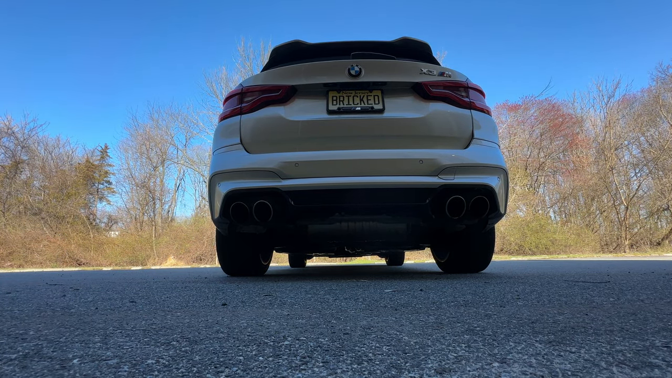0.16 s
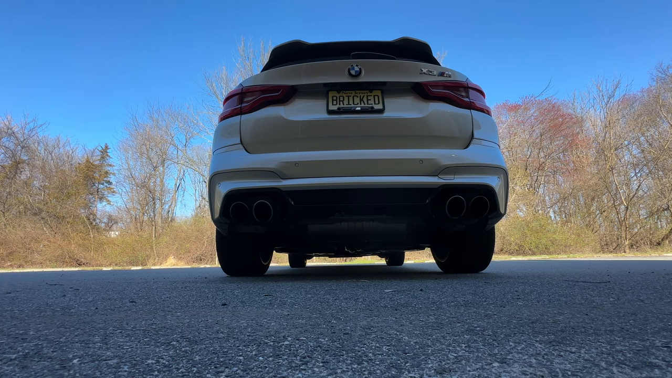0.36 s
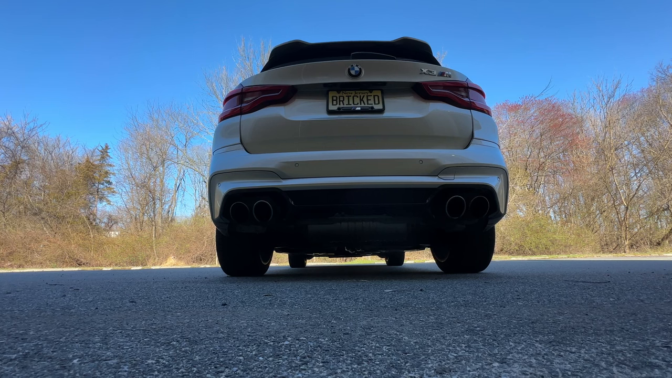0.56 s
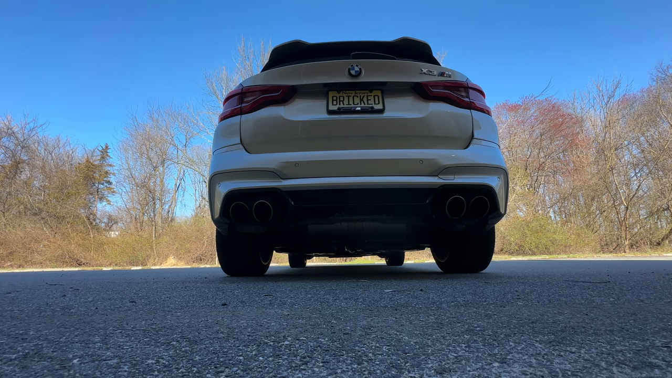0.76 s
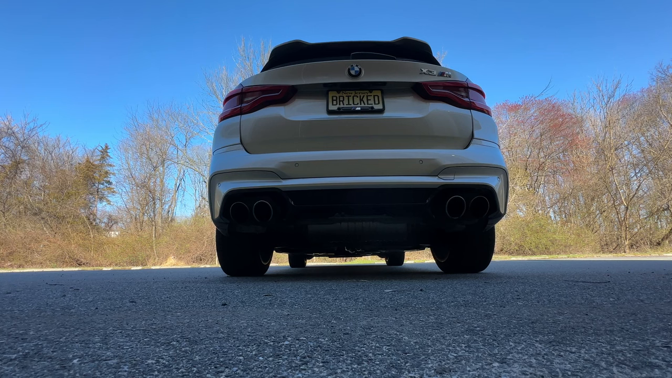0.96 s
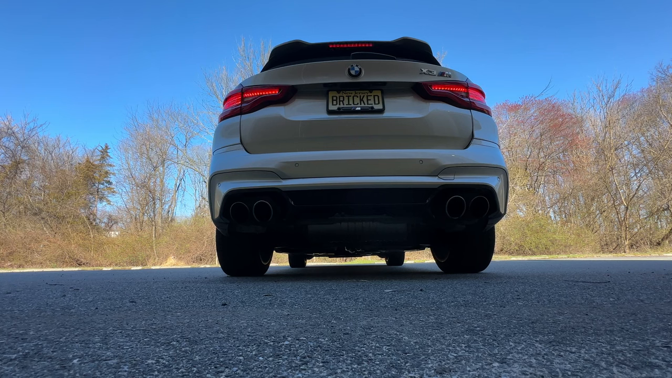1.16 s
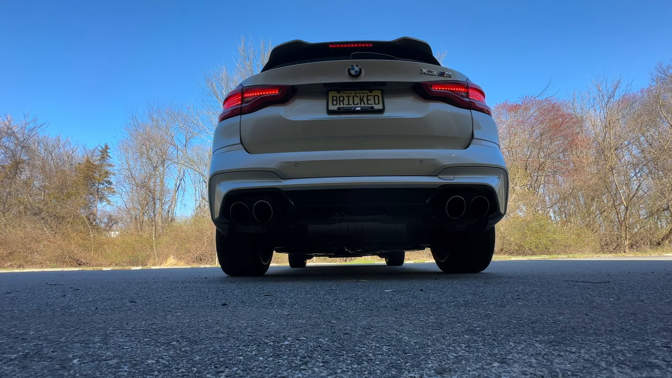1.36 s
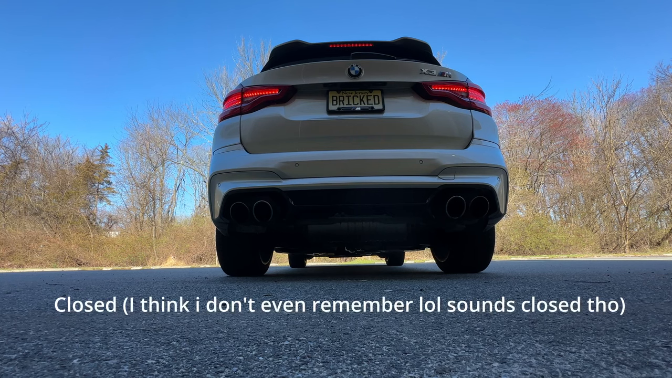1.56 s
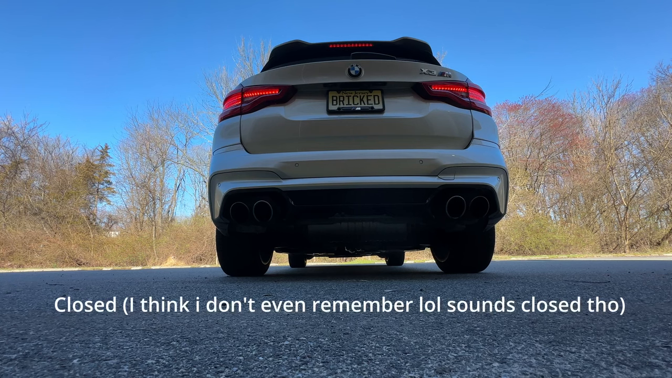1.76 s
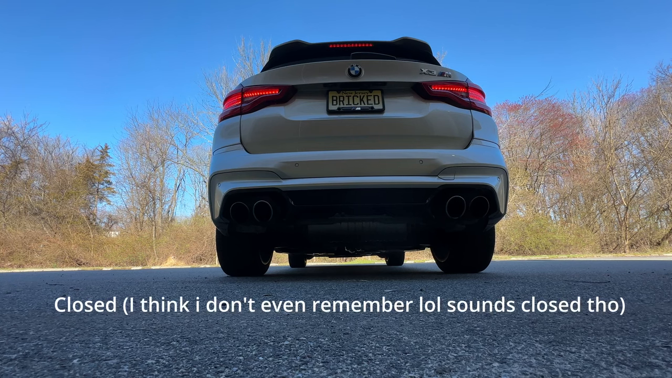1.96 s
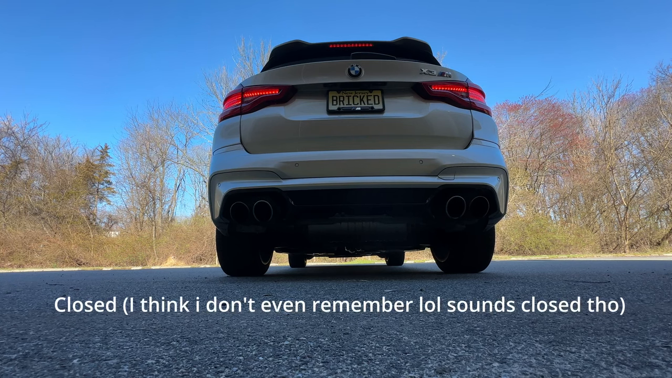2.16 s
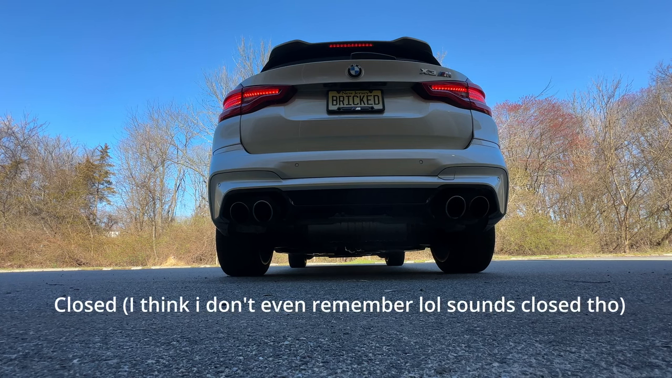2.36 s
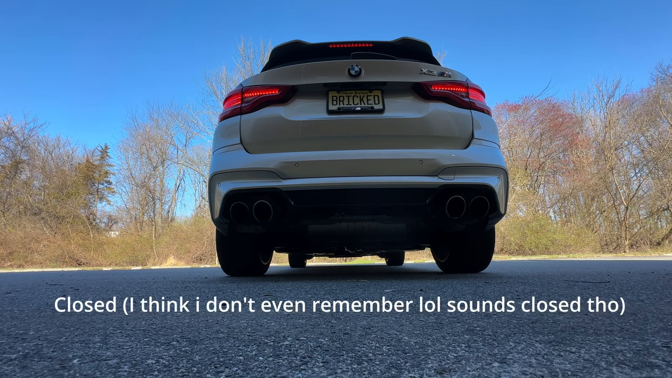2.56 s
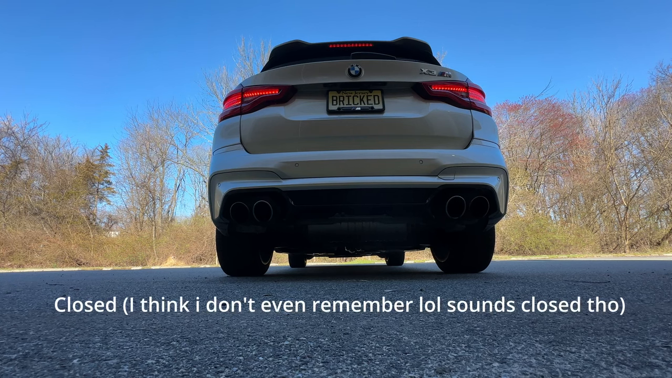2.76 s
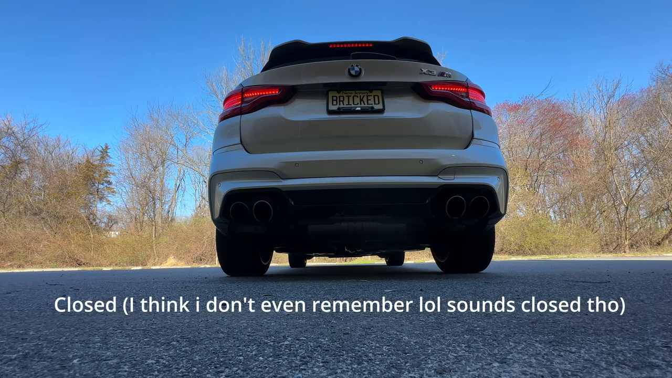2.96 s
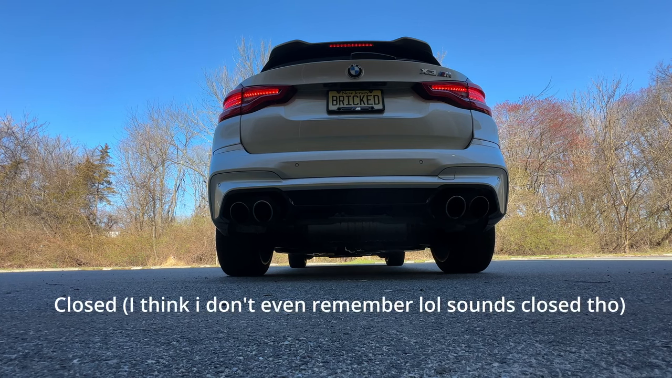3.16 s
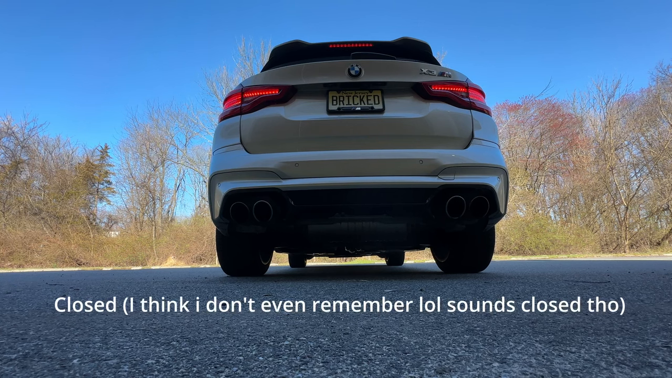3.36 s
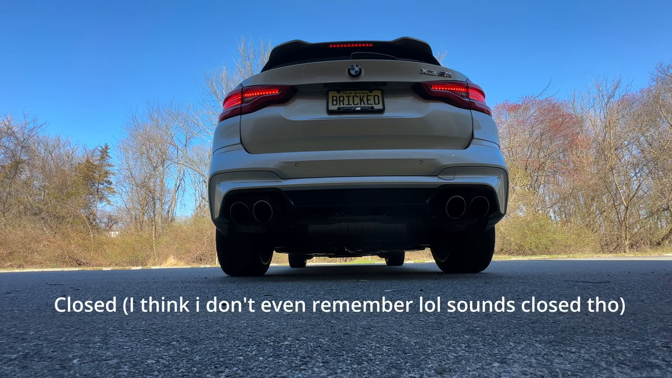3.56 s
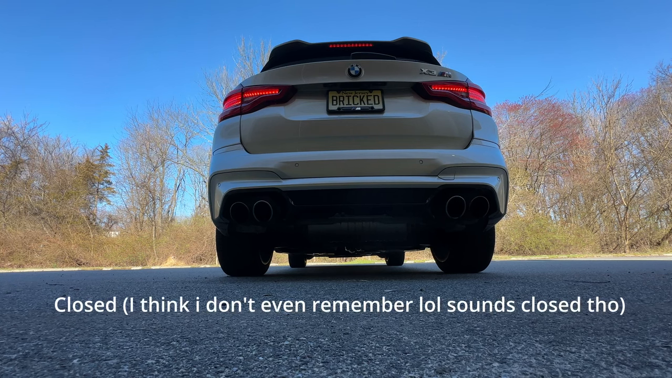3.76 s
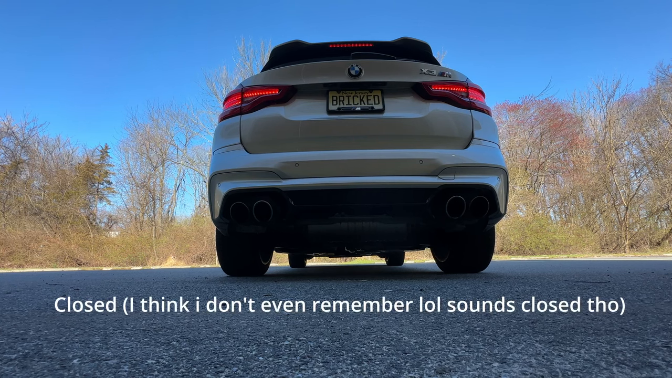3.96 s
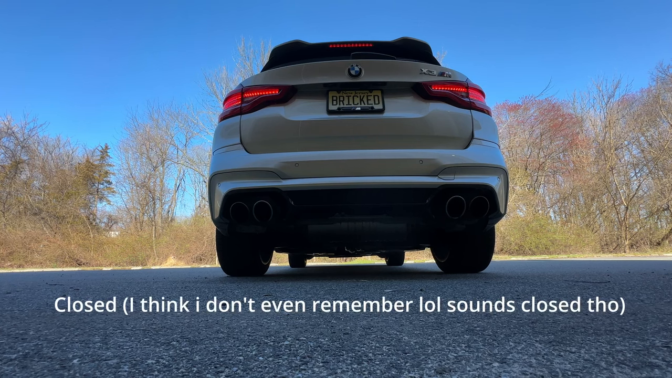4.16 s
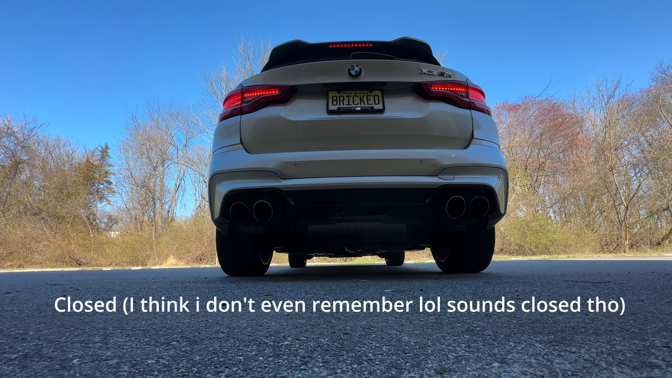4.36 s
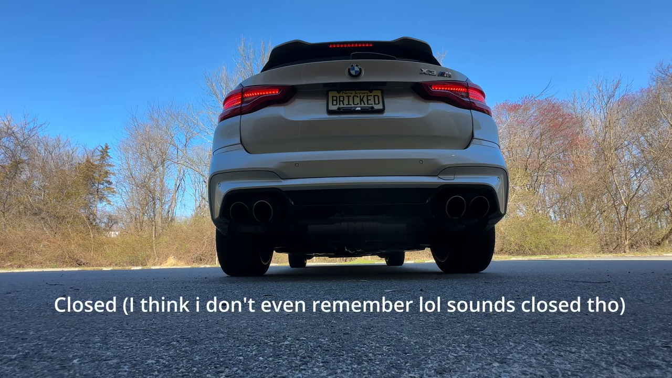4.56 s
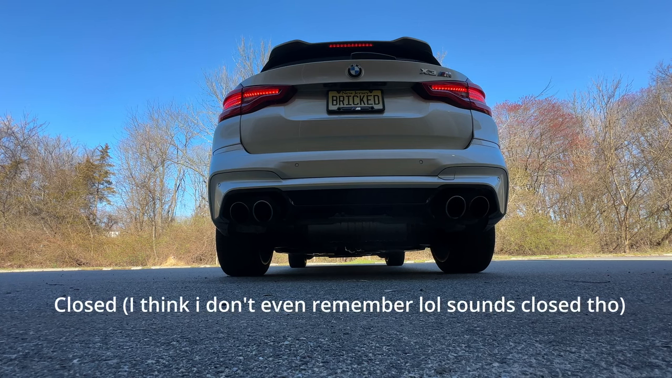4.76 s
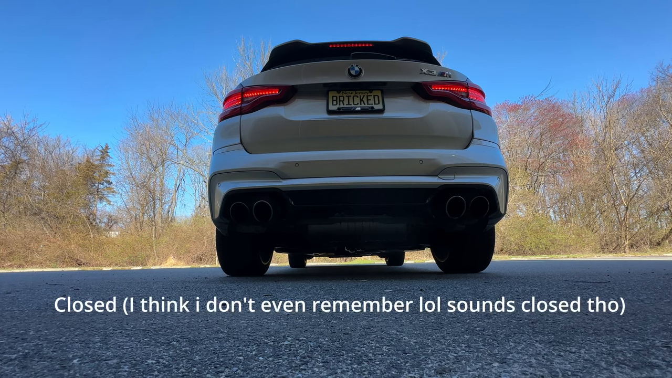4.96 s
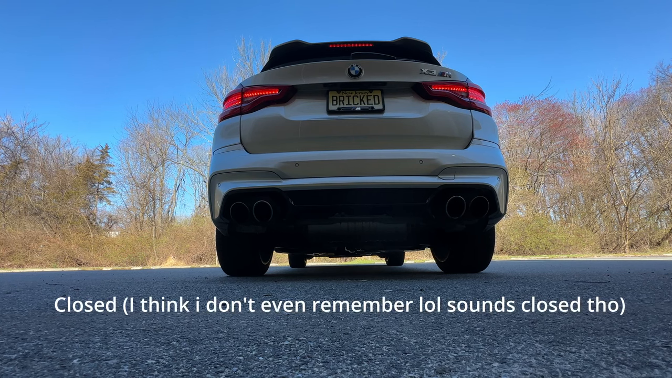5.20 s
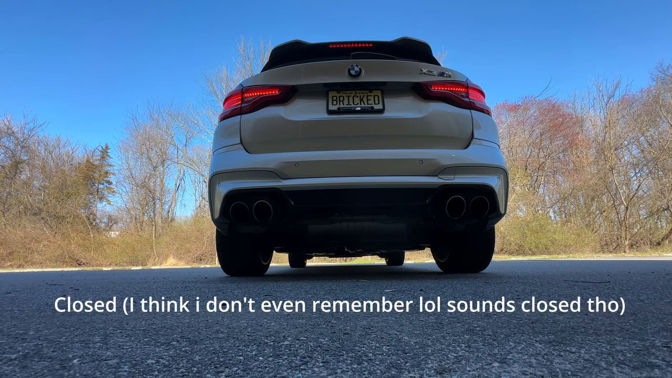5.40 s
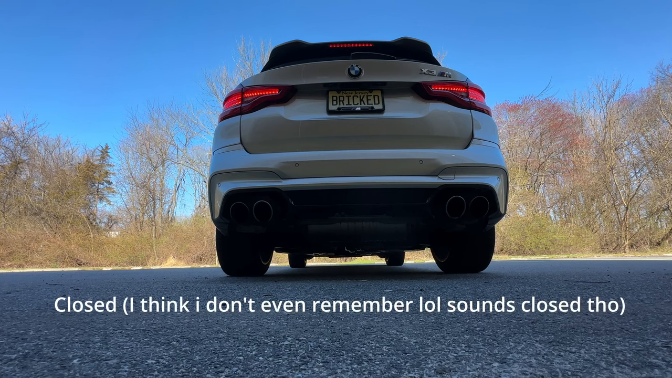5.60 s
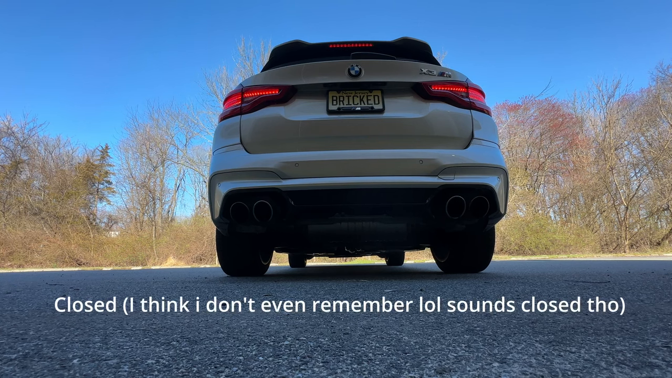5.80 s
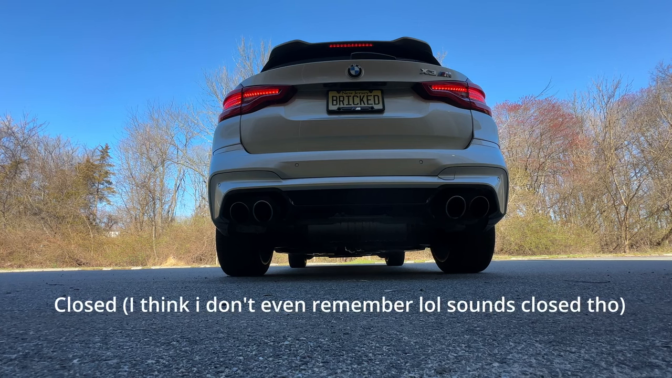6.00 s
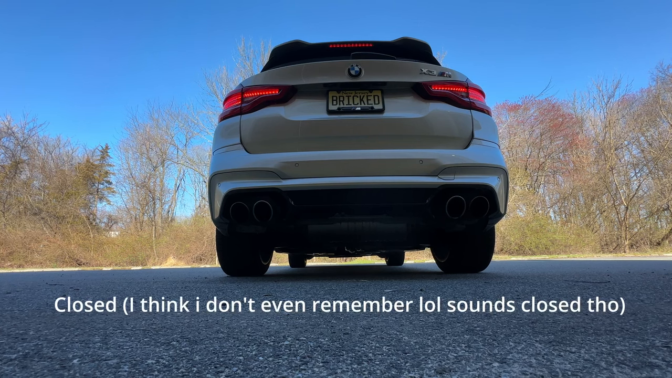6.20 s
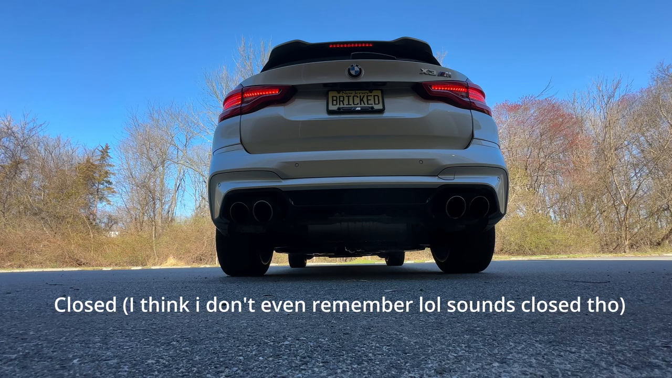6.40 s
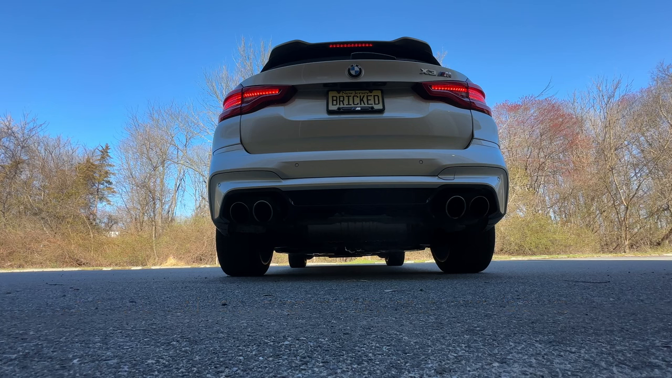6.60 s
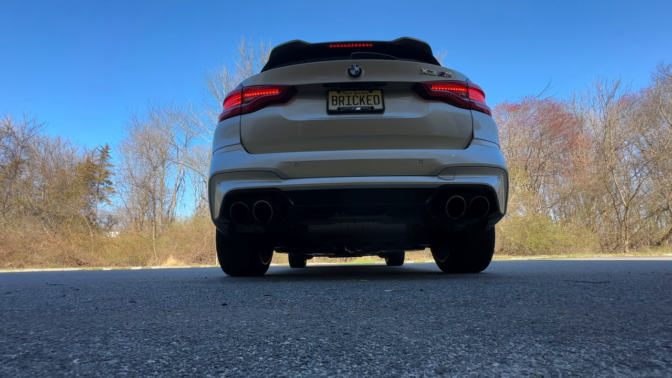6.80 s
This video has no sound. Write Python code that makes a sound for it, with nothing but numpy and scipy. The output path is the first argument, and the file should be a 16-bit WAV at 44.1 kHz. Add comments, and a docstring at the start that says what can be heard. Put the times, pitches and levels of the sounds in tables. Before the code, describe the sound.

An open outdoor place, heard low and close behind a parked car's tailpipes in stereo. From 0 s, faint low traffic rumble and a few thin bird peeps, with tiny clicks. At 0.73 s a door shuts: a dull, heavy double thump, rattling trim and latch clicks until about 1.1 s, then near quiet. A relay buzzes softly at 1.65 s; at 1.74 s the starter engages with metallic clacks, gritty whirring, wavering high whines and low compression thumps, squealing briefly before ending near 2.3 s. At 2.1 s the engine catches with sharp bangs and hissy spits, its throaty note climbing quickly to a peak around 2.6 s. It hunts raggedly with pops until 3.15 s, then smooths and gradually sinks in pitch and loudness. From 4 s to 6.8 s a deep, gently lumpy idle continues, with occasional soft burbles, block clatter and light valve ticking.

```python
"""Distant traffic rumbles while small birds peep, around a parked six-cylinder car heard behind its tailpipes.
Small parts click and a door shuts with a thud: soft blows ring the body, and noise makes the shaking trim.
A relay buzzes, then the starter cranks with coloured noise, gliding whines, clacks and compression thumps.
The engine catches with a rough flare and pops, built from firing-rate tones and pulses that ring the pipes.
It settles to a lumpy idle, with noise from the block and short tones for the ticking valve gear."""
import sys
import numpy as np
from scipy import signal
from scipy.fft import rfft, irfft, next_fast_len
from scipy.io import wavfile
from scipy.ndimage import uniform_filter1d

SR = 44100
rng = np.random.default_rng(int(sys.argv[2]) if len(sys.argv) > 2 else 0)


def nominal_scale(level):
    """Amplitude ratio for a level in decibels (scalar or array-like)."""
    x = np.asarray(level, float) / 20
    return 10 ** x


def materialize(psi):
    """Save the field psi as 16-bit PCM at rate SR to the path in sys.argv[1].

    A 1-D psi becomes a single channel; in a 2-D psi each row is a channel.
    """
    bounded = np.clip(np.atleast_2d(psi).T, -1, 1)
    quanta = np.round(bounded * 32767).astype(np.int16)
    wavfile.write(sys.argv[1], SR, quanta)


N = 301644
T = np.arange(N) / SR
PADDED = next_fast_len(N + 8192)
HZ = np.fft.rfftfreq(PADDED, 1 / SR) + 1  # the extra 1 Hz keeps the logarithm finite
SETTLES_S = 3.15  # when the engine stops hunting

# silencer box resonances [f/Hz, width/Hz, level/dB]
BOXES = [(48, 12, -10.5), (79.3, 43.4, 5.5), (92, 18.7, -0.5), (149.4, 23.5, -9), (237.9, 21.8, -3.5),
         (253, 55, -2)]
# tailpipe resonances [f/Hz, width/Hz, level/dB]
TAILS = [(438.1, 20.6, 3.5), (567.6, 44.5, 4.5), (635, 71, 5.5), (776, 80, -23.5), (835, 18.3, -15.5),
         (309.3, 26, -3.5)]


def curves(rows, silent=()):
    """Draw lines through a table over time; columns in silent drop steeply beyond both ends."""
    s, *columns = np.transpose(rows)
    outside = np.maximum(np.maximum(s[0] - T, T - s[-1]), 0)
    drop_db = np.minimum(outside * 5000, 150)
    return [np.interp(T, s, column) - (k in silent) * drop_db for k, column in enumerate(columns)]


def over_hz(points):
    """Draw a line through a table over frequency, on a logarithmic scale."""
    hz, value = np.transpose(points)
    return np.interp(np.log(HZ), np.log(np.maximum(hz, 1)), value)


def unit(x):
    """Scale a sound to an rms of 1."""
    return x / np.sqrt(np.mean(x ** 2))


def noise(points, rings=()):
    """Colour random noise by a table [f/Hz, level/dB] and raise it at resonances."""
    lift = 1 + sum(nominal_scale(db) / (1 + (2 * (HZ - hz) / width) ** 2) for hz, width, db in rings)
    spectrum = rfft(rng.standard_normal(PADDED)) * nominal_scale(over_hz(points)) * lift
    return unit(irfft(spectrum, PADDED)[:N])


def ring(x, hz, width):
    """Let a sound excite one resonance; a pulse of 1 rings it at height 1."""
    p = np.exp((2j * np.pi * hz - np.pi * abs(width)) / SR)
    return signal.lfilter([0, p.imag], [1, -2 * p.real, abs(p) ** 2], x)


def pipes(x, modes):
    """Add up resonances with alternating sign."""
    return sum((-1) ** k * nominal_scale(db) * ring(x, hz, width) for k, (hz, width, db) in enumerate(modes))


def blows(s, db):
    """Put single pulses at given times."""
    x = np.zeros(N)
    np.add.at(x, (np.asarray(s) * SR).astype(int), nominal_scale(db))
    return x


def fade(x, t60):
    """Turn each pulse into an envelope that falls by 60 dB in t60 seconds."""
    return signal.lfilter([1], [1, -np.exp(-np.log(1000) / (abs(t60) * SR))], x)


def soften(x, size):
    """Smooth a signal twice over a number of samples."""
    return uniform_filter1d(uniform_filter1d(x, size), size)


def walk(rate):
    """Wander smoothly between random values, drawn rate times a second, with a spread near 1."""
    k = int(SR / rate)
    return 1.535 * soften(np.repeat(rng.standard_normal(N // k + 1), k), k)[:N]


def span_db(start, rise_db_s, end, fall_db_s):
    """Stay at 0 dB between two times, sloping away before and after."""
    return -np.minimum(rise_db_s * np.maximum(start - T, 0) + fall_db_s * np.maximum(T - end, 0), 200)


def bump(s, length):
    """Make a smooth hump of height 1."""
    return np.exp(-((T - s) / length) ** 2)


def passings(turns, share):
    """Find the samples at which a turning part passes one share of its round."""
    return np.flatnonzero(np.diff(np.floor(turns - share)) > 0)


def traffic():
    """Low rumble of two noises: one shared by both ears, one opposite in them; the shared one wavers."""
    # overall level [t/s, level/dB]
    traffic_level = [(0, -39.5), (.6, -40), (1.2, -43.5), (1.7, -44), (2.1, -45)]
    # colour of the shared rumble [f/Hz, level/dB per Hz]
    far_mid = [(18, -66), (30, -36), (48, -18.5), (59, -19.5), (82, -5), (102, -20), (157, -16.5),
               (187, -28.5), (246, -26.5), (301, -30.5), (387, -30.5), (2730, -62), (3100, -64),
               (3430, -69.5), (12000, -82), (15600, -111), (22000, -120)]
    # colour of the difference between the ears [f/Hz, level/dB per Hz]
    far_side = [(15, -77), (25, -39), (70, -6.5), (225, -14.5), (314, -13.5), (440, -15), (797, -10.5),
                (1340, -30), (12000, -74.5), (15600, -99), (22000, -120)]
    mid = noise(far_mid) * nominal_scale(0.39 * walk(11.0))
    side = nominal_scale(-7.5) * noise(far_side)
    return nominal_scale(curves(traffic_level)[0]) * (mid + side * np.array([[1], [-1]]))


def birds():
    """Thin peeps: sine tones whose pitch and level waver slightly."""
    # peeps [t/s, length/s, f/Hz, level/dB]
    peeps = [(.14, .09, 3020, -73), (.37, .27, 2430, -75), (1.21, .05, 4430, -73)]
    waver = np.cumsum(1 + .007 * walk(150)) / SR
    song = 0
    for s, length, hz, db in peeps:
        along = np.clip((T - s) / length, 0, 1)
        swell = np.sqrt(np.abs(np.sin(np.pi * along)))
        song = song + nominal_scale(db + 3 * walk(61.5)) * swell * np.sin(2 * np.pi * hz * waver)
    return song


def trim():
    """Trim shakes as flickering noise: a quick rise, a sagging level, then a faster fade."""
    # colour of the shaking [f/Hz, level/dB per Hz]
    trim_colour = [(120, -36), (200, 1), (310, -1), (488, -11), (728, -5), (940, -13), (1030, -12.5),
                   (1430, -11.5), (1680, -33), (2060, -22.5), (2470, -34.5), (2800, -28), (3750, -37.5),
                   (15500, -66)]
    from_s, until_s, sag_db_s = 0.736, 0.82, 44.5
    shake_db = -27.5 - sag_db_s * (T - from_s) - 5 * (T > until_s)
    # the sag is part of the final fade of 58 dB/s
    shake_db = shake_db + span_db(from_s, 700, until_s, 58 - sag_db_s)
    return nominal_scale(shake_db + 2.2 * walk(70)) * noise(trim_colour)


def small_clicks():
    """Latch, seat and pedal clicks: short fading bursts of noise."""
    # clicks [t/s, level/dB, 60 dB fade/s]
    clicks = [(.153, -62, .2), (0.334, -57, 0.15), (0.394, -51, 0.27), (0.653, -57, 0.12),
              (0.71, -58, 0.065), (0.762, -43.5, 0.13), (0.804, -48.5, 0.25), (0.853, -42, 0.053),
              (0.879, -38.5, 0.052), (0.937, -49, 0.04), (1.055, -58.5, .2), (1.084, -65, 0.22)]
    # colour of a click [f/Hz, level/dB per Hz]
    click_colour = [(440, -11), (1000, -2), (1320, 0.5), (1700, -8), (3300, -12), (15000, -33.5)]
    return sum(fade(blows([s], db), t60) for s, db, t60 in clicks) * noise(click_colour)


def door():
    """Soft blows ring the body shell and slap the seals; the latch rings, trim shakes, small parts click."""
    # blows of the closing door [t/s, level/dB]
    thuds = [(0.73, -2), (0.742, -7.5), (0.765, 3), (0.788, -12.5), (0.814, -4)]
    # body shell resonances [f/Hz, level/dB, ring time/s that sets the width]
    body = [(69.2, 0.5, 0.54), (131, -0.5, 0.132), (195, 4, 0.032), (368, -11, 0.18), (482, 3.5, 0.012)]
    # the latch catches, then the door meets its frame [t/s, level/dB]
    latch = [(.709, -24.5), (0.7305, -16)]
    # what the latch rings [f/Hz, width/Hz, level/dB]
    latch_rings = [(328, 79, 1), (537, 140, -0.5), (776, 110, -7.5), (1350, 200, -12)]
    hits = blows(*np.transpose(thuds))
    shell = [(hz, 2.63 / ring_s, db) for hz, db, ring_s in body]
    thud = nominal_scale(-7.0) * pipes(uniform_filter1d(hits, size=130), shell)
    seals = noise([(120, -22.0), (250, 15.5), (500, 9.0), (800, -7), (1400, -13.0), (4000, -47)])
    slap = nominal_scale(-34.5) * fade(hits, 0.1) * seals
    catch = pipes(blows(*np.transpose(latch)), latch_rings)
    return thud + slap + trim() + small_clicks() + catch


def relay():
    """Relay and solenoid before cranking: two fading buzzes of resonant noise."""
    # pulls [t/s, level/dB, 60 dB fade/s whose sign is ignored]
    pulls = [(1.652, -61, 0.3), (1.672, -50, -0.8)]
    # what they ring [f/Hz, width/Hz, level/dB]
    relay_rings = [(844, 78, -8), (1170, 69, 1), (1415, 50, -1), (2200, 140, -15), (3180, 80, -18),
                   (4100, 90, -19)]
    envelope = uniform_filter1d(sum(fade(blows([s], db), t60) for s, db, t60 in pulls), size=130)
    buzz = sum(nominal_scale(db) * unit(ring(rng.standard_normal(N), hz, width)) for hz, width, db in relay_rings)
    return envelope * unit(buzz)


def gear_whine():
    """Pinion, planet and ring gears sing as flickering tones at multiples of one shaft."""
    # gear mesh, slowing on each compression [t/s, f/Hz, level/dB]
    whine_path = [(1.82, 3800, -52), (1.845, 4000, -50), (1.855, 4100, -39), (1.865, 3850, -58),
                  (1.88, 4050, -54), (1.89, 4200, -42), (1.9, 4300, -52), (1.912, 4420, -39),
                  (1.925, 4150, -52), (1.94, 3850, -43), (1.955, 3800, -58), (2.0, 3900, -50),
                  (2.017, 4080, -41), (2.03, 4300, -56), (2.05, 4450, -45), (2.058, 4600, -53),
                  (2.068, 4800, -44), (2.085, 4820, -47), (2.1, 4900, -54), (2.115, 5150, -44),
                  (2.14, 5300, -56)]
    mesh_hz, whine_db = curves(whine_path, silent=(1,))
    mesh = 2 * np.pi * np.cumsum(mesh_hz * (1 + .022 * walk(500))) / SR
    whine = 0
    for multiple, db in ((1, 0), (.68, -12), (1.14, -16)):
        whine = whine + nominal_scale(whine_db + db + 6 * walk(50)) * np.sin(multiple * mesh)
    return whine


def pinion_squeals():
    """Short falling tones with an unsteady pitch as the pinion slips."""
    # squeals [t/s, length/s, start f/Hz, end f/Hz, level/dB]
    squeals = [(1.87, .08, 2100, 2040, -35), (2.005, .035, 5080, 4900, -39), (2.225, .045, 1750, 1300, -33),
               (2.305, .045, 1480, 1130, -27)]
    sound = 0
    for s, length, from_hz, to_hz, db in squeals:
        along = np.clip((T - s) / length, 0, 1)
        hz = from_hz + (to_hz - from_hz) * along
        glide = np.cumsum(hz * (1 + .016 * walk(350))) / SR
        sound = sound + nominal_scale(db) * np.sin(np.pi * along) * np.sin(2 * np.pi * glide)
    return sound


def starter():
    """Gritty gear whirr and whine, pinion clacks and soft compression thumps from the pipes."""
    # the gears grind harder in strokes and ease between them [t/s, length/s, change/dB]
    grinds = [(1.802, .02, -2), (1.868, 0.014, -0.5), (1.932, 0.014, 3), (1.997, 0.022, -4.5),
              (2.017, .015, 3), (2.11, 0.0087, 3.5), (2.13, 0.0052, -7), (2.137, .008, 5.5),
              (2.158, .012, -7.5), (2.21, 0.013, 2), (2.227, .008, -5), (2.26, 0.012, 1),
              (2.282, 0.012, -3), (2.32, .02, 7.5), (2.43, .012, 19)]
    # colour of the whirr [f/Hz, level/dB per Hz]
    whirr_colour = [(150, -25), (250, -12.5), (366, -1), (420, 0), (1010, -3), (1330, -4), (1700, -9.5),
                    (2090, -7), (3630, -10.5), (4240, -7), (6000, -22.5), (9070, -22), (10100, -37.5),
                    (13500, -26.5), (15500, -53.5)]
    # resonances of the whirr [f/Hz, width/Hz, lift/dB]
    whirr_rings = [(513, 8.3, 1.5), (820, 120, -3), (1322, 290, 9.5), (2026, 28, 2), (2188, 19, 3),
                   (2880, 81, 3.5), (3170, 60, -9), (4200, 140, -33), (4200, 51, -29), (5470, 150, -25)]
    # the pinion strikes the ring gear [t/s, level/dB]
    clack_hits = [(1.7429, -16.5), (1.7629, -12), (1.7752, -36), (2.0066, -23.5), (2.135, -24), (2.25, -26),
                  (2.3244, -26)]
    # compression strokes while cranking [t/s, level/dB]
    compressions = [(1.768, -17), (1.876, -12.5), (1.938, -23), (1.986, -10.5), (2.039, -22.5),
                    (2.077, -18)]

    engage_s = 1.743
    whirr_db = -29 - 10.5 * (T - engage_s) + sum(db * bump(s, length) for s, length, db in grinds)
    whirr_db = whirr_db + span_db(1.726, 5000, 2.325, 450)
    whirr_db = whirr_db - 12.5 * (T < engage_s)  # it spins quietly until the gears mesh
    teeth = rng.random((int(900 * T[-1]), 2))  # random tooth hits, 900 a second
    teeth_db = -8 - 3 * np.log(teeth[:, 1] + .01)
    grit = 1 + fade(blows(teeth[:, 0] * T[-1], teeth_db), .008)
    whirr = unit(noise(whirr_colour, whirr_rings) * grit) * nominal_scale(2.0 * walk(60.56))
    # the housing's resonances grind up and down on their own
    for hz, db in ((804, -10.5), (1150, -11.5), (1420, -11), (2106, -9), (2480, -19), (2795, -14),
                   (3150, -13.5)):
        whirr = whirr + nominal_scale(db + 3 * walk(40.1)) * unit(ring(rng.standard_normal(N), hz, 80))
    treble = noise([(4000, -38), (6000, 7.0), (14000, -9.0), (15500, -40.0)])
    running = nominal_scale(whirr_db) * (whirr + nominal_scale(-26) * treble)

    hits = blows(*np.transpose(clack_hits))
    clacks = nominal_scale(-14.5) * pipes(hits, whirr_rings)
    clacks = clacks + nominal_scale(-5.0) * fade(hits, 0.091) * noise(whirr_colour, whirr_rings)
    clacks = clacks + nominal_scale(-39.5) * fade(hits, 0.038) * treble
    thumps = pipes(uniform_filter1d(blows(*np.transpose(compressions)), size=90), BOXES)
    return running + gear_whine() + pinion_squeals() + relay() + clacks + thumps


def valve_ticks(turn, start_s):
    """Valve gear taps once a cycle: short fading tones with a trembling pitch."""
    # taps [share of the cycle, f/Hz, width/Hz that sets the tremble, 60 dB fade/s, level/dB]
    taps = [(0, 8300, 160, .06, -66), (.16, 8100, 180, .08, -64), (.49, 8100, 180, .06, -68),
            (.65, 8150, 180, .06, -66), (.82, 8100, 180, .06, -69), (.41, 5450, 90, .1, -69),
            (.47, 5450, 60, .1, -65), (.81, 5450, 80, .08, -68), (.32, 6850, 150, .07, -67),
            (.61, 6850, 150, .06, -69), (.82, 6850, 150, .06, -67), (.84, 4200, 200, .07, -58),
            (.44, 4200, 130, .08, -60), (.15, 4200, 130, .05, -61), (.85, 4800, 130, .06, -62),
            (.43, 1400, 250, .06, -43), (.01, 1300, 250, .07, -45), (.67, 1250, 250, .06, -47)]
    ticks, wobble = 0, walk(300)
    for share, hz, width, t60, db in taps:
        at = passings(turn / 6, share)  # six firings make one cycle
        at = at[T[at + 1] > start_s]
        tap = fade(blows(at / SR, db + 1.5 * rng.standard_normal(len(at))), t60)
        tone = np.sin(2 * np.pi * np.cumsum(hz + .6 * width * wobble) / SR)
        ticks = ticks + uniform_filter1d(tap, size=130) * unit(tone)
    return ticks


def block_noise(turn):
    """Engine block and fan noise: the block knocks at every firing and loose parts clatter between."""
    # colour [f/Hz, level/dB per Hz]
    block_colour = [(410, -2.5), (700, -15.5), (861, 4.5), (943, -8.5), (1320, -2.5), (1670, -6.5),
                    (3190, -12.5), (3770, -20.5), (4240, -18), (6940, -37), (7600, -30), (8210, -34.5),
                    (9980, -45), (13300, -39), (15500, -76.5)]
    # resonances [f/Hz, width/Hz, lift/dB]
    block_rings = [(1104, 11, 2.4), (1187, 30, 6.3), (1297, 26, 1), (1335, 18, 1.9), (1465, 92, 2.3),
                   (2030, 56, 6.3), (2280, 22, 1.7), (2504, 31, 3.3), (2727, 41, 1), (3164, 75, 4.9),
                   (4080, 27, 1.2), (4940, 71, 3), (6750, 420, 5.4)]
    knocks = passings(turn, .85) / SR  # share of the gap between firings
    knock_db = 1 + 2.5 * rng.standard_normal(len(knocks))  # some knocks are harder
    loose = rng.random((500, 2))
    clatter = fade(blows(loose[:, 0] * T[-1], -5 - 14 * loose[:, 1]), 0.037)
    beat = 1 + fade(blows(knocks, knock_db), 0.08) + clatter
    return unit(noise(block_colour, block_rings) * soften(beat, 50))


def pops(turn):
    """Loud late burns ring the tailpipes and boxes; at idle some cylinders add lazy burns once a cycle."""
    # loud late burns [t/s, level/dB, boom above that level/dB]
    late_burns = [(2.104, -10, -22), (2.128, -22, -5), (2.155, -4.5, -23), (2.178, -14, -7),
                  (2.22, -15, 0.5), (2.261, -10.5, 0), (2.279, -6.5, -9), (2.323, -17, -16),
                  (2.342, -5.5, -21), (2.41, -4.5, 0), (2.466, -18, 20), (2.495, -28, -5),
                  (2.529, -25.5, 18), (2.563, -7, 11.5), (2.578, -2, -22), (2.595, -4.5, -4.5),
                  (2.646, -10.5, -13), (2.676, -27.5, 24.5), (2.709, -29, 10), (2.753, -16, 18),
                  (2.771, -11.5, -13), (2.841, -27.5, 20.5), (3.023, -5.5, -13.5), (3.068, -7, -19.5),
                  (3.211, -24, 9.5), (3.361, -23.5, -21), (3.508, -21, -9), (3.668, -23, -9),
                  (3.826, -20.5, -6), (3.987, -22.5, 11.5), (4.123, -25.5, 15), (4.476, -22, -4),
                  (4.644, -25.5, -22), (4.978, -20.5, -24), (5.097, -24, -16), (5.265, -25, -13),
                  (5.313, -23.5, -8), (5.821, -20.5, -18), (6.16, -23.5, -12), (6.335, -22, 4),
                  (6.453, -27.5, 7.5), (6.619, -23, -28)]
    # lazy burns [share of the cycle, level/dB]
    lazy_burns = [(0.038, -33), (.54, -39), (.74, -34), (.88, -37)]
    s, pop_db, low_db = np.transpose(late_burns)
    bangs = blows(s, pop_db)
    for share, db in lazy_burns:
        lazy = passings(turn / 6, share)
        lazy = lazy[T[lazy + 1] > SETTLES_S]
        # a loud burn takes the place of a lazy one
        lazy = lazy[np.abs(lazy[:, None] / SR - s).min(axis=1) > .03]
        bangs = bangs + blows(lazy / SR, db + 3 * rng.standard_normal(len(lazy)))
    bangs = soften(bangs, 18)  # a bang is a rounded push under a millisecond long
    boom = pipes(uniform_filter1d(blows(s, pop_db + low_db), size=40), BOXES[3:])
    return nominal_scale(-6.5) * pipes(bangs, TAILS[1:]) + nominal_scale(-9) * pipes(bangs, TAILS[:1]) + nominal_scale(-8.5) * boom


def spits():
    """Thin spits of treble noise while the engine flares."""
    # spits [t/s, level/dB]
    bursts = [(2.1034, -27), (2.138, -25), (2.183, -34.5), (2.452, -46.5), (2.479, -48.5), (2.527, -43),
              (2.572, -56), (2.6283, -49), (2.6645, -47.5), (2.698, -42), (2.791, -50.5), (2.8286, -50),
              (2.873, -48), (3.039, -43.5), (3.096, -55.5)]
    hiss = noise([(2500, -4.0), (6000, -3.5), (9000, -4.0), (14000, -12.0), (15500, -24.5)])
    return nominal_scale(-6.5) * fade(blows(*np.transpose(bursts)), 0.14) * hiss


def tailpipe_bark(late):
    """Each burn feeds every tailpipe resonance by its own amount, as a soft noisy puff of gas."""
    bark = 0
    for hz, width, db in TAILS:
        puffs = fade(blows(late, 4.6 * rng.standard_normal(len(late))), 0.22) + 0.2
        bark = bark + nominal_scale(db) * ring(puffs * rng.standard_normal(N), hz, width)
    return unit(bark)


def even_throb(hz, turn, above):
    """Even exhaust note: tones at multiples of half the firing rate, filtered by the silencer."""
    # tones [multiple of half the firing rate, level/dB]
    orders = [(2, -3), (3, -24), (4, -2), (5, 1.5), (6, -5), (7, -23), (8, -10), (9, -14), (10, -12),
              (11, -20), (12, -16), (13, -10), (14, -8), (15, -10), (16, -20)]
    # what the silencer passes [f/Hz, level/dB]
    silencer = [(24, -22), (35, 0), (285, 0), (330, -14)]
    # in the flare two boxes sing as even multiples of the firing rate pass [t/s, front lift/dB, rear lift/dB]
    singing = [(2.1, 12, 8), (2.13, 9, 10), (2.19, 13, 13), (2.23, 5, 14), (2.32, 5, 14), (2.36, 0, 2),
               (2.52, 3, 4), (2.57, 3, 24), (2.72, 4, 22), (2.8, 2, 2), (3.1, 4, 0), (3.2, 0, 0)]
    # the firing note itself comes and goes while the engine hunts [t/s, change/dB]
    deep_note = [(2.3, -6), (2.35, -23), (2.47, 1), (2.56, -3), (2.64, -17), (2.7, 5), (2.76, -10.5),
                 (2.82, 8.5), (2.91, -5), (3.07, 3), (3.115, -10.5), (3.2, 2)]
    # the two pipes match best as the engine settles, then drift apart
    apart = 1 - np.exp(-np.maximum(T - SETTLES_S, 0) / .5)
    odd_db = np.where(T < SETTLES_S, -10, -22 + 22 * apart)
    deep_db, (front_db, rear_db) = curves(deep_note)[0], curves(singing)
    throb = 0
    for k, db in orders:
        note_hz = k * hz / 2
        passed_db = np.interp(note_hz, *np.transpose(silencer)) + deep_db * (k == 2)
        # the top of the throb falls behind when the load rises
        passed_db = passed_db - .8 * np.clip(above, 0, 7) * (k > 12)
        if k % 4 == 0:
            passed_db = passed_db + front_db / (1 + ((note_hz - 90) / 15) ** 2)
            passed_db = passed_db + rear_db / (1 + ((note_hz - 258) / 40) ** 2)
        # higher multiples arrive less steadily
        phase = np.pi * k * (turn - .3) + .059 * k * k - 2.87 - np.pi / 2 * (k % 2)
        phase = phase + .003 * k * k * walk(14)
        # odd multiples come from two pipes that do not match
        throb = throb + nominal_scale(db + passed_db + odd_db * (k % 2) + 1.4 * walk(6.3)) * np.cos(phase)
    return unit(throb)


def ragged_burns(late, burn_db):
    """Uneven burns push on the silencer boxes, with a little noise."""
    pushes = uniform_filter1d(blows(late, burn_db), size=40)
    return unit(pipes(pushes + 0.02 * rng.standard_normal(N), BOXES))


def engine():
    """Even throb, ragged burns, tailpipe bark, pops, block noise and valve ticks on one crank."""
    # crank speed [t/s, firing rate/Hz]
    crank = [(2.09, 21), (2.17, 23), (2.21, 27.5), (2.3, 34), (2.4, 38.5), (2.5, 41), (2.58, 44.3),
             (2.66, 42.5), (2.8, 41.3), (3.05, 41), (3.2, 41.3), (3.34, 40.2), (3.55, 39.3), (3.75, 38.2),
             (3.91, 37.4), (4.3, 36.5), (4.6, 36.1), (5.2, 35.75), (6.0, 35.25), (6.84, 34.8)]
    # ragged while it hunts, smooth once it settles [t/s, raggedness 0-1]
    ragged_path = [(2.12, .6), (2.19, .3), (2.38, .3), (2.45, .55), (3.08, .55), (3.18, .25), (4.3, .1)]
    # load, as the level of the silencer boom before surges [t/s, level/dB]
    load = [(2.098, -25), (2.11, -7.5), (2.2, -8.5), (2.33, -8), (2.4, -14.5), (2.7, -18), (2.82, -19.5),
            (2.95, -16), (3.1, -18), (3.4, -21), (3.75, -26), (4.3, -27), (5.5, -28), (6.1, -28),
            (6.84, -26.5)]
    # richer burns lift the load for a moment [t/s, lift/dB]
    surges = [(2.58, 0.5), (3.52, 3), (3.66, 2.5), (4.44, 4), (6.16, 4.5), (6.34, 2.5)]

    hz = curves(crank)[0]
    turn = np.cumsum(hz * (1 + .002 * walk(6.6))) / SR  # counts firings
    turn = turn - turn[int(4.970 * SR)]  # a cycle begins at this time
    surge_db = sum(db * bump(s, 0.04) for s, db in surges)
    boom_db = curves(load)[0] + surge_db
    rough = np.clip(curves(ragged_path)[0] + .09 * surge_db, 0, .9)  # a surge also burns raggedly
    # bark and block noise follow the load gently at idle and steeply above a knee
    above, steep = boom_db + 26, np.maximum(boom_db + 18, 0)
    bark_db = -40 + 0.71 * above + 1.36 * steep
    block_db = -44 + 0.084 * above + 1.02 * steep

    at = passings(turn, .2)
    chance = rng.standard_normal((len(at), 2))
    late = np.clip(at / SR + 0.003005 * chance[:, 0], 0, T[-1])  # burns scatter by about 3 ms
    boom = np.sqrt(1 - rough ** 2) * even_throb(hz, turn, above)
    boom = boom + rough * ragged_burns(late, 2.2 * chance[:, 1])
    exhaust = nominal_scale(boom_db) * boom + nominal_scale(bark_db) * tailpipe_bark(late)
    running = nominal_scale(span_db(load[0][0], 5000, T[-1], 0))
    steady = running * (exhaust + nominal_scale(block_db) * block_noise(turn))
    return steady + pops(turn) + spits() + valve_ticks(turn, crank[0][0])


def scene():
    """The car reaches both microphones directly, off the road, and scattered from the underbody."""
    # the bounce off the road cancels some bands [f/Hz, width/Hz, depth 0-1]
    road_dips = [(951, 69, 0.75), (3835, 390, 0.33), (7770, 500, 0.65)]
    # delays of the scattered sound [t/s]
    scatter_delays = [.0013, .0031, .0053, .0087]
    # balance of the microphones [f/Hz, left minus right level/dB]
    lean_points = [(60, -1.0), (110, -1.0), (200, -2.0), (380, -4.0), (700, -5.5), (1290, -2.5),
                   (2380, -2.0), (4400, -7), (8120, -7.0), (15000, 0.3)]
    # how alike the two microphones hear the car [f/Hz, likeness from -1 to 1]
    like_points = [(60, 1.0), (130, 1), (290, 0.97), (640, 0.87), (1410, 0.67), (3100, 0.3), (6820, -0.064),
                   (15000, 0.094)]
    car = rfft(birds() + door() + starter() + engine(), PADDED)
    for hz, width, depth in road_dips:
        car = car * (1 - np.clip(depth, 0, 1) * np.exp(-((HZ - hz) / width) ** 2))
    # repeating echoes that smear time but leave every frequency equally loud
    scatter = 1
    for s in scatter_delays:
        echo = np.exp(-2j * np.pi * HZ * s)
        scatter = scatter * (echo - .5) / (1 - .5 * echo)
    like = np.clip(over_hz(like_points), -.9, .999)
    wide = np.sqrt((1 - like) / (1 + like)) * scatter
    lean = nominal_scale(over_hz(lean_points) / 2)
    both = car * np.array([lean * (1 + wide), (1 - wide) / lean])
    return irfft(both, PADDED)[:, :N] + traffic()


def roll_off(x):
    """The treble ends steeply here."""
    return signal.sosfilt(signal.butter(12, 15700, fs=SR, output="sos"), x)


def record(dry):
    """The microphone drops the deepest bass; the recorder rounds the loudest peaks."""
    low_cut = signal.butter(2, 26, "high", fs=SR, output="sos")
    heard = signal.sosfiltfilt(low_cut, dry)
    mix = np.tanh(1.025 * heard) / 1.011
    return roll_off(mix)


dry = scene()
out = record(dry)
materialize(out)
```